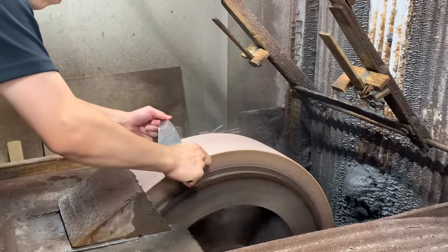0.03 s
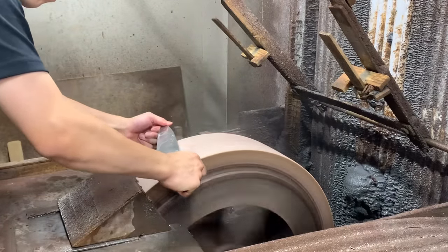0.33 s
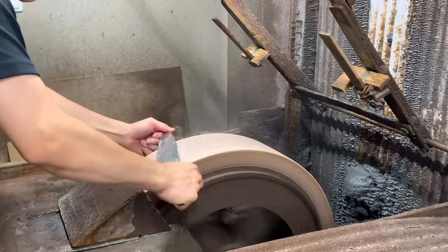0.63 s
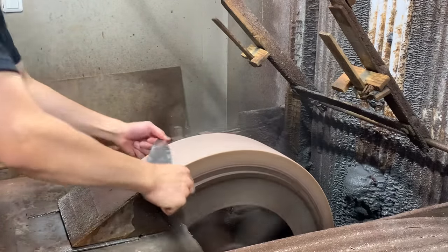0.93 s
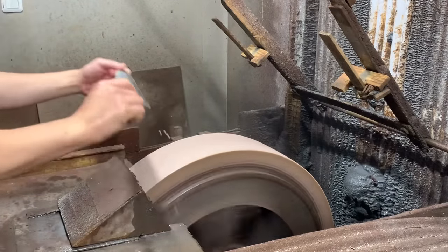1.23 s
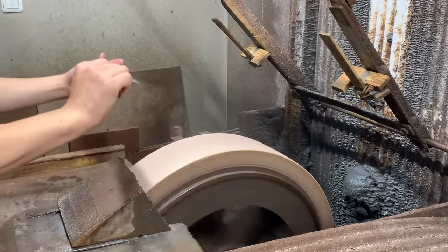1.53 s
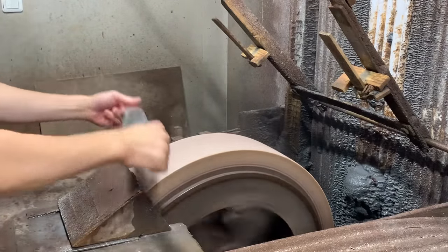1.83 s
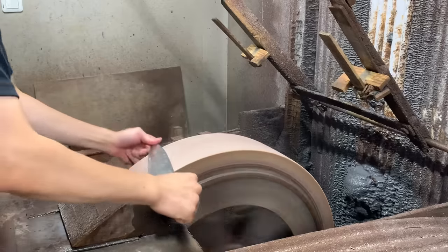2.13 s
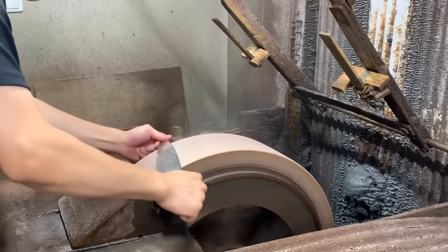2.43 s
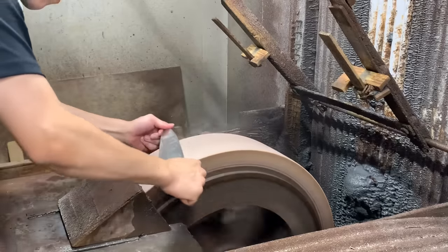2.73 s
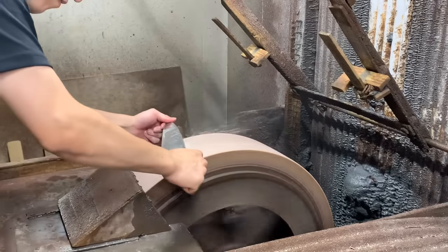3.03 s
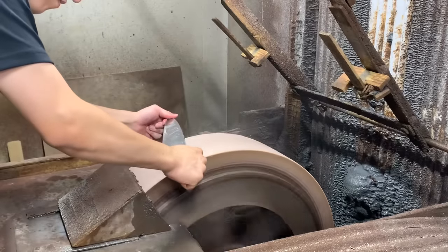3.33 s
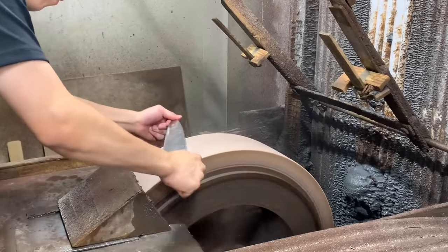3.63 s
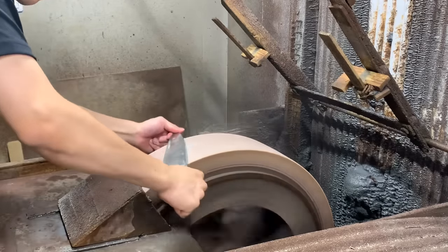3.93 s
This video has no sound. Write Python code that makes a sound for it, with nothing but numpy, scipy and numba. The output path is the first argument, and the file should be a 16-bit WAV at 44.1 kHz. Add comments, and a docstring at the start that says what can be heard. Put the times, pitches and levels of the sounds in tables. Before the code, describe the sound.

A knife grinds against a spinning grindstone with a gritty, ringing hiss. It slides off with a bright zing, leaving the machine rumbling, then lands again and keeps grinding with a few dull bumps in a workshop.

```python
"""A knife is held to a large spinning grindstone in a workshop; the drive rumbles and a faint whine sinks.
Grit scratches the steel and rings its modes; two resonances glide as the contact moves along the blade.
At 0.85 s the knife slides off with a bright zing and rings on softly over the running machine.
At 2.05 s it lands again, skips once and grinds to the end; near 2.3 s and 3.8 s it bumps
on the wheel, which growls under the load."""
import sys
import numpy as np
from scipy import signal
from scipy.fft import rfft, irfft
from scipy.io import wavfile
from scipy.ndimage import uniform_filter1d
from numba import njit

SR = 44100
rng = np.random.default_rng(int(sys.argv[2]) if len(sys.argv) > 2 else 0)


def inscribe(sig):
    """Save sig as 16-bit PCM at rate SR to the path in sys.argv[1].

    A 1-D sig is mono; a 2-D sig holds one channel per row.
    Samples are clipped to [-1, 1] before scaling.
    """
    pcm = np.round(np.clip(np.atleast_2d(sig).T, -1, 1) * 32767)
    wavfile.write(sys.argv[1], SR, pcm.astype(np.int16))


N = 176400
TIME_S = np.arange(N) / SR

# bite of the edge, one list per stroke: t/s, relative level/dB
EDGE_BITE = [
    [(0, -37), (.4, -35), (.55, -33), (.67, -34), (.79, -27), (.812, -20.5), (.84, -29), (.86, -44)],
    [(2.047, -31), (2.1, -37), (2.25, -35.5), (2.45, -31.5), (2.75, -34.5), (2.98, -39), (3.17, -39.5),
     (3.47, -32), (3.62, -38.5), (3.74, -32), (3.82, -31), (4, -28)],
]
WANDER_HZ, WANDER_DB, DRIFT_RATIO = 9, 2, 0.003  # blade modes: rate, spread of level and of pitch


def undb(db):
    """Decibels to gain."""
    return 10 ** (np.asarray(db) / 20)


def unit(x):
    """Scale to rms 1."""
    return x / np.sqrt(np.mean(x ** 2))


def curve(rows, column=1):
    """One column of a time table, at every sample."""
    rows = np.array(rows)
    return np.interp(TIME_S, rows[:, 0], rows[:, column])


def colour(x, points):
    """Filter by a table of f/Hz, gain/dB."""
    hz, db = np.array(points).T
    bins_hz = np.maximum(np.fft.rfftfreq(N, 1 / SR), 1)
    return irfft(rfft(x) * undb(np.interp(np.log(bins_hz), np.log(hz), db)), N)


def walk(rate_hz):
    """Smooth random wander, rms 1."""
    hold = max(int(SR / rate_hz), 2)
    steps = np.repeat(rng.standard_normal(N // hold + 1), hold)
    return unit(uniform_filter1d(uniform_filter1d(steps, hold), hold)[:N])


@njit
def bandpass(x, hz, width_hz):
    """State-variable band-pass with a moving centre, peak gain 1."""
    y, band, low = np.empty(len(x)), 0., 0.
    for i in range(len(x)):
        g = np.tan(np.pi * hz[i] / SR)
        damping = np.pi * width_hz / SR * (1 + g * g) / g
        v = (band + g * (x[i] - low)) / (1 + g * (g + damping))
        band, low, y[i] = 2 * v - band, low + 2 * g * v, damping * v
    return y


def pressed(stroke, touch_s=0.00049, leave_s=0.004):
    """1 while the blade touches the stone: quick touch, softer release."""
    touch = np.clip((TIME_S - stroke[0][0]) / touch_s, 0, 1)
    return touch * np.exp(-np.maximum(TIME_S - stroke[-1][0], 0) / leave_s)


def rumble(spectrum):
    """Stereo noise of a given spectrum, rms 1: alike on both sides in the bass, diffuse in the middle."""
    # diffuse noise against common noise: f/Hz, level/dB
    diffuse = [(40, -13), (220, -5), (500, 0), (1500, 8), (5000, 6), (7500, -7), (16000, -12)]
    noise = rng.standard_normal(N) + colour(rng.standard_normal((2, N)), diffuse)
    flatten = [(hz, -10 * np.log10(1 + undb(db) ** 2)) for hz, db in diffuse]
    return unit(colour(colour(noise, flatten), spectrum))


def machine(whine_hz=1136, sink_hz_per_s=40.7, whine_db=-52.5):
    """Rumble and wavering hum of the drive, and a thin, rough whine that sinks."""
    # noise of wheel, drive and air: f/Hz, relative level/dB
    spectrum = [(20, -26), (33, 0), (60, 3), (90, -5.5), (140, -7), (250, 2), (310, -7), (500, -4.5),
                (800, -12.5), (1300, -15), (2600, -18.5), (6000, -21.5), (8300, -18.5), (12500, -20.5),
                (16000, -24.5)]
    # course of that noise: t/s, level/dB
    levels = [(0, -38.5), (.95, -37.5), (1.3, -37), (1.8, -35.5), (2.3, -35.5), (4, -34)]
    # hum of the drive: f/Hz, width/Hz, level/dB
    hum = [(130.6, 10, -47), (152.6, 12, -50), (177, 12, -50), (267, 12, -46.5), (470, 10, -51.5),
           (595, 20, -54.5)]
    out = rumble(spectrum) * undb(curve(levels) + 0.31 * walk(15.27))
    for hz, width_hz, db in hum:
        amplitude = np.sqrt(2) * undb(db + 3.7 * walk(width_hz))
        pitch_hz = hz + width_hz / 2 * walk(2 * width_hz)
        out = out + amplitude * np.sin(2 * np.pi * np.cumsum(pitch_hz) / SR)
    whine = bandpass(rng.standard_normal(N), whine_hz - sink_hz_per_s * TIME_S, width_hz=26.)
    return out + undb(whine_db) * unit(whine)


def wheel_load(rise_s=0.042, rub_db=-43.5):
    """The wheel rumbles while it is rubbed and growls when the blade is leaned on."""
    # pushes on the wheel: t/s, level/dB, decay/s
    loads = [(2.33, -31.5, 0.13), (2.46, -35.5, 0.5), (3.77, -32, 0.54)]
    # loaded wheel: f/Hz, relative level/dB
    spectrum = [(20, -24), (40, 0), (66, 5), (105, -8), (150, -3.5), (300, -8), (600, -8.5), (1200, -31),
                (4000, -57)]
    growl = 0
    for start_s, db, decay_s in loads:
        age_s = TIME_S - start_s
        growl += undb(db) * np.clip(age_s / rise_s, 0, 1) * np.exp(-np.maximum(age_s - rise_s, 0) / decay_s)
    rub = undb(rub_db) * sum(map(pressed, EDGE_BITE))
    return rumble(spectrum) * np.hypot(growl, rub)


def thuds(rise_s=.009, decay_s=.036):
    """The blade bumps on the wheel: a low damped swing and a short, dull rattle."""
    # bumps: t/s, f/Hz, swing gain/dB, rattle gain/dB
    bumps = [(2.338, 155, -26, -32), (3.762, 98, -23, -40), (3.83, 58, -24, -35)]
    # rattle: f/Hz, relative level/dB
    spectrum = [(60, -12), (200, 0), (750, -5), (1200, -26), (4000, -50)]
    out, rattle = 0, rumble(spectrum)
    for start_s, hz, swing_db, rattle_db in bumps:
        age_s = np.maximum(TIME_S - start_s, 0)
        swell = (1 - np.exp(-age_s / rise_s)) * np.exp(-age_s / decay_s)
        out = out + swell * (undb(swing_db) * np.sin(2 * np.pi * hz * age_s) + undb(rattle_db) * rattle)
    return out


def workshop(x, t60_s=0.3, treble_t60_s=0.22, split_hz=7000, shift_hz=6):
    """Direct sound and a short tail per side; the reflections shift as the blade moves."""
    # reverberation against direct sound: f/Hz, gain/dB
    room = [(100, -8), (600, 1), (2000, 1.5), (5000, 3), (7500, -4), (11000, -8), (16000, -5)]
    lowpass = signal.butter(2, split_hz, fs=SR, output="sos")
    highpass = signal.butter(2, split_hz, "high", fs=SR, output="sos")
    wet = 0
    for _ in range(6):
        noise = rng.standard_normal((2, N))
        low = signal.sosfilt(lowpass, noise) * undb(-60 * TIME_S / t60_s)
        high = signal.sosfilt(highpass, noise) * undb(-60 * TIME_S / treble_t60_s)
        fade = np.cos(2 * np.pi * (rng.random() + np.cumsum(shift_hz * walk(3)) / SR))
        wet = wet + irfft(rfft(x * fade) * rfft(low - high), N)
    return unit(x + colour(unit(wet) * np.std(x), room)) * np.std(x)


def grit(grains_per_s=540, spread_db=4, decay_s=0.0032, share=0.39, chatter_db=1.2, chatter_hz=32):
    """Dense scratching in which coarse grains strike and die away; the hand-held blade chatters."""
    hits = rng.random(N) < grains_per_s / SR
    strikes = hits * undb(spread_db * np.minimum(rng.exponential(size=N), 5))
    power = signal.lfilter([1], [1, -np.exp(-2 / (decay_s * SR))], strikes ** 2)
    scratch = rng.standard_normal(N) * np.sqrt(1 - share + share * power / power.mean())
    return scratch * undb(chatter_db * walk(chatter_hz))


def ring(hz, width_hz):
    """One steep resonance driven by grit, rms 1."""
    centre_hz = hz * np.ones(N)
    narrow = bandpass(grit(), centre_hz, float(width_hz))
    return unit(bandpass(narrow, centre_hz, 2.65 * width_hz))


def free_ring(lift_s=.85, t60_s=.8):
    """Off the stone, the blade rings on softly in narrow, beating bands."""
    # modes of the free blade: f/Hz, level/dB
    modes = [(3480, -46), (3990, -46), (6020, -47), (7240, -45)]
    age_s = TIME_S - lift_s
    tones = sum(undb(db) * ring(hz, width_hz=45) for hz, db in modes)
    return tones * (age_s > 0) * undb(-60 * np.abs(age_s) / t60_s)


def landing(decay_s=.0009):
    """Two ticks: the edge lands on the stone and skips once."""
    # impacts: t/s, relative level/dB
    impacts = [(2.0472, -14), (2.0648, -17)]
    # tick: f/Hz, gain/dB
    spectrum = [(500, 2), (1800, 4), (3200, -10), (6000, -4), (9000, 5), (12500, 7), (16000, -2)]
    ticks = sum((TIME_S > s) * np.exp(-np.abs(TIME_S - s) / decay_s) * undb(db) for s, db in impacts)
    return colour(rng.standard_normal(N) * ticks, spectrum)


def contact_rings():
    """The moving contact makes two resonances glide; strong modes come and go as it crosses their nodes."""
    # gliding resonances, one list each: t/s, f/Hz, level/dB
    glides = [
        [(0, 2060, -35), (.2, 2296, -35), (.43, 2480, -38), (.6, 2450, -44), (.79, 2430, -33), (.87, 2420, -45),
         (2.06, 1760, -31), (2.25, 1830, -50), (2.47, 2360, -38), (2.7, 2450, -46), (2.97, 2280, -34),
         (3.2, 2220, -39), (3.4, 1890, -37), (3.9, 1800, -44)],
        [(0, 3850, -43), (.48, 3550, -53), (.6, 3670, -35), (.69, 3950, -29), (.78, 3950, -37),
         (.825, 3970, -24.5), (.86, 4030, -42), (2.07, 3920, -34.5), (2.58, 3950, -38), (2.8, 3960, -50),
         (3.65, 3750, -50), (3.86, 3980, -33), (4, 3920, -40)],
    ]
    # singing modes: f/Hz, width/Hz, list of (t/s, level/dB)
    singing = [(1175, 50, [(0, -38), (.2, -36), (.33, -41), (.83, -42), (2.05, -47), (2.85, -37),
               (4, -39)]), (3500, 95, [(0, -34), (.2, -31.5), (.27, -42), (.5, -44), (.82, -35),
               (2.05, -42), (2.21, -32), (2.3, -41), (2.5, -37), (2.88, -46), (3.02, -36), (3.4, -43),
               (3.79, -36), (4, -40)]), (4743, 105, [(0, -43), (.76, -47), (.83, -33), (2.05, -45),
               (2.65, -47), (2.85, -40), (3.15, -48), (3.27, -36.5), (3.47, -39), (3.6, -48), (4, -40)]),
               (5990, 170, [(0, -41), (.45, -42), (.65, -37), (.78, -40), (.83, -19.5), (.87, -40),
               (2.15, -37), (2.28, -45), (2.98, -38), (3.2, -49), (3.72, -43), (3.81, -34), (3.91, -40),
               (4, -32)]), (7240, 160, [(0, -41), (.29, -43), (.79, -37), (.84, -22), (.87, -34),
               (2.08, -38), (2.55, -38), (2.7, -43), (3.6, -44), (4, -35)])]
    out = sum(ring(curve(path), width_hz=170) * undb(curve(path, column=2)) for path in glides)
    for hz, width_hz, levels in singing:
        out = out + ring(hz * (1 + DRIFT_RATIO * walk(WANDER_HZ)), width_hz) * undb(curve(levels))
    return out * sum(map(pressed, EDGE_BITE))


def steel(force, modes, scrape):
    """Scrape plus ringing modes, each swelling and drifting as the contact shifts; rms 1."""
    out = colour(force, scrape)
    for hz, width_hz, db in modes:
        push = force * undb(db + WANDER_DB * walk(WANDER_HZ))
        out = out + bandpass(push, hz * (1 + DRIFT_RATIO * walk(WANDER_HZ)), float(width_hz))
    return unit(out)


def grinding(flex_below_hz=3000, sizzle_above_hz=7000):
    """Grit drives the blade in three ranges: flexing of the flat, bite of the edge, treble sizzle."""
    # blade modes: f/Hz, width/Hz, gain/dB
    blade_modes = [(832, 22, 1), (918, 20, -2), (1588, 28, .5), (1880, 45, -3), (2225, 45, -2),
                   (2830, 80, -9), (5370, 220, 1), (8900, 200, 5), (10650, 220, 4), (11950, 150, -1),
                   (12570, 150, 5), (13750, 140, -6), (14380, 130, 1)]
    # flexing and sizzle, one list per stroke: t/s, relative level/dB
    flex = [
        [(0, -30.5), (.2, -32.5), (.35, -34), (.57, -31.5), (.69, -33), (.81, -31.5), (.85, -41), (.885, -64)],
        [(2.047, -63), (2.16, -34.5), (2.28, -36), (2.35, -33), (2.65, -35), (2.8, -33), (3.3, -30.5),
         (3.43, -31), (3.6, -31.5), (4, -35)],
    ]
    sizzle = [
        [(0, -31), (.2, -27.5), (.45, -33), (.72, -26), (.795, -28), (.84, -17), (.86, -20), (.885, -25)],
        [(2.047, -22.5), (2.085, -24.5), (2.14, -31.5), (2.27, -32), (2.36, -28.5), (2.6, -27), (2.8, -31.5),
         (3.3, -32.5), (3.72, -28), (4, -24)],
    ]
    # broad scrape of the grit in each range: f/Hz, gain/dB
    flex_scrape = [(200, -19), (500, -9), (750, -18), (1050, -10), (1330, -10.5), (1750, -2.5),
                   (2500, -10.5), (3200, -21.5), (6000, -23)]
    bite_scrape = [(1200, -36), (2500, -2.5), (3300, 6), (4100, 1), (4450, 3.5), (5600, -11), (6600, -15),
                   (9000, -29.5)]
    sizzle_scrape = [(4000, -22), (6500, -4), (9500, -.5), (11500, -.5), (13300, -2.5), (16000, -3),
                     (18000, -30)]
    out, force = 0, grit()
    for strokes, scrape, gain_db, low_hz, high_hz in [
            (flex, flex_scrape, -2.5, 0, flex_below_hz),
            (EDGE_BITE, bite_scrape, -3, flex_below_hz, sizzle_above_hz),
            (sizzle, sizzle_scrape, -1, sizzle_above_hz, SR)]:
        effort = sum(pressed(stroke) * undb(curve(stroke) + gain_db) for stroke in strokes)
        modes = [mode for mode in blade_modes if low_hz <= mode[0] < high_hz]
        out = out + effort * steel(force, modes, scrape)
    return out


def scene():
    """The blade in the workshop, over the running machine."""
    blade = landing() + grinding() + contact_rings() + free_ring()
    return workshop(blade) + machine() + wheel_load() + thuds()


def record(dry, ceiling=.75, top_hz=15800):
    """Microphone pair, unequal in level and phase; rounded peaks and a steep treble cut."""
    # left minus right: f/Hz, level/dB
    balance = [(50, -3), (280, -5.5), (700, -1), (1150, 1), (1800, 0), (3200, -1), (5500, -3.5), (7000, -2),
               (16000, 1)]
    # lead of the left: f/Hz, phase/rad
    lead = [(0, 0), (300, .2), (500, 1.2), (1600, 0), (3000, 2.3), (5500, 2.6), (6200, 0), (7000, -.9),
            (8300, -3.1), (11000, -6.3), (13500, -9.4), (15500, -12.4)]
    lead_rad = np.interp(np.fft.rfftfreq(N, 1 / SR), *np.array(lead).T)
    left = colour(dry[0], [(hz, db / 2) for hz, db in balance])
    left = irfft(rfft(left) * np.exp(1j * lead_rad), N)
    right = colour(dry[1], [(hz, -db / 2) for hz, db in balance])
    rounded = ceiling * np.tanh(np.array([left, right]) / ceiling)
    return signal.sosfilt(signal.ellip(10, .2, 80, top_hz, fs=SR, output="sos"), rounded)


dry = scene()
out = record(dry)
inscribe(out)
```